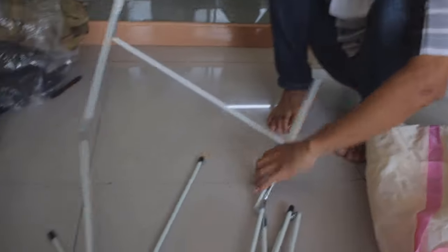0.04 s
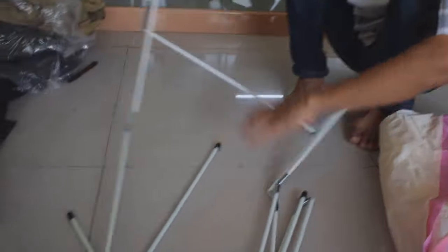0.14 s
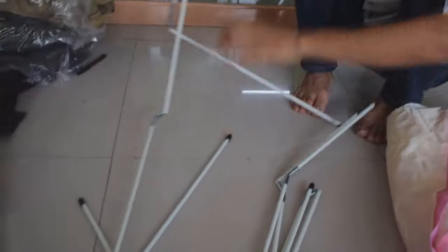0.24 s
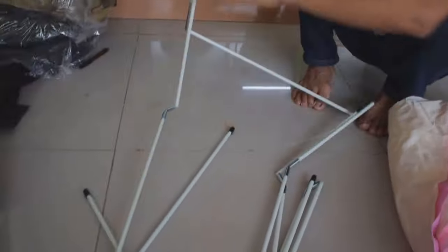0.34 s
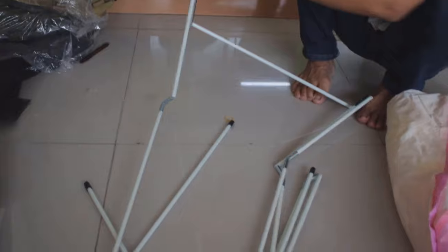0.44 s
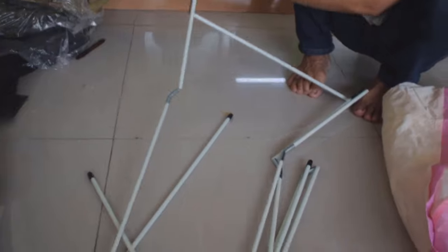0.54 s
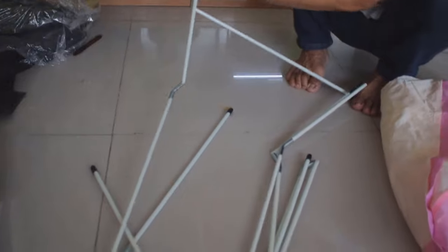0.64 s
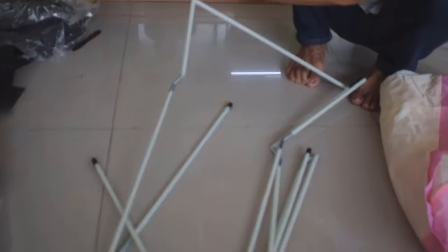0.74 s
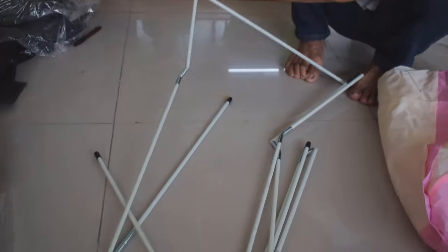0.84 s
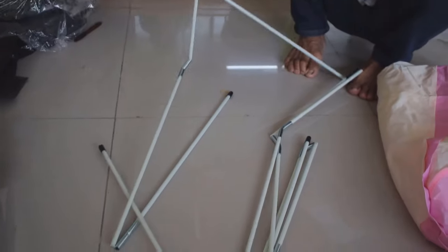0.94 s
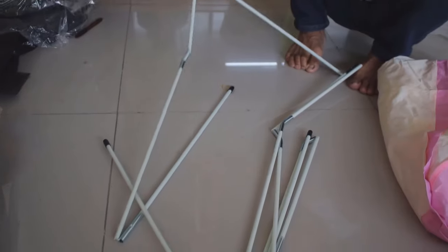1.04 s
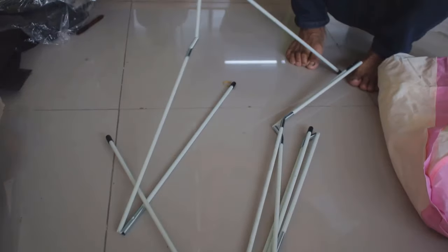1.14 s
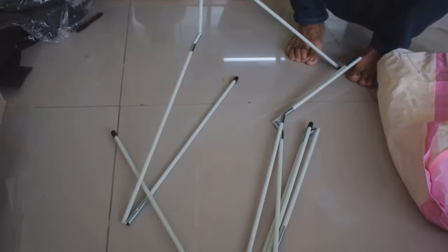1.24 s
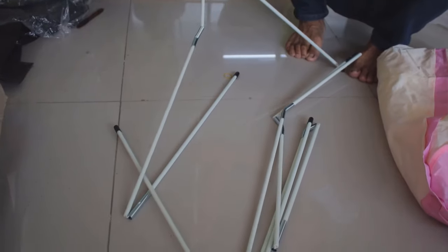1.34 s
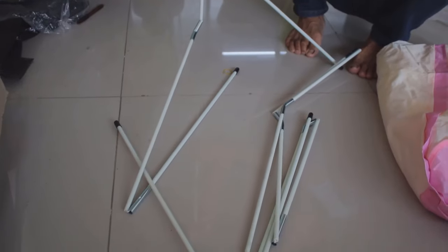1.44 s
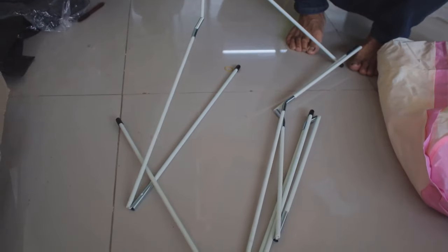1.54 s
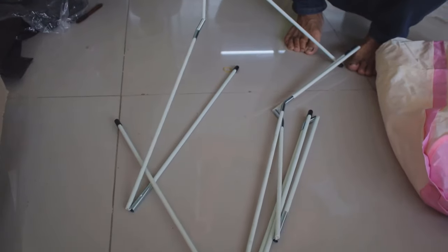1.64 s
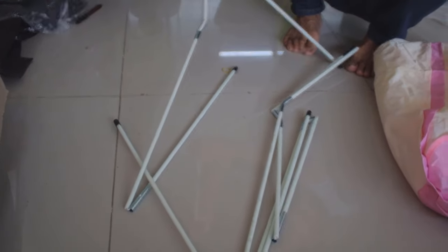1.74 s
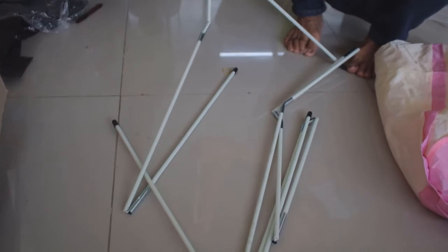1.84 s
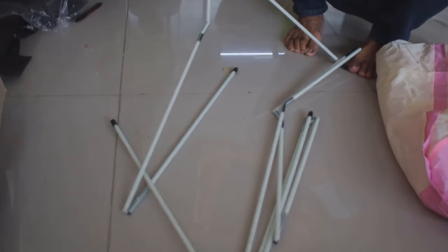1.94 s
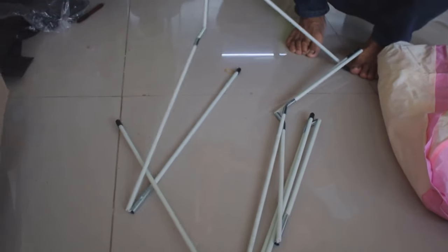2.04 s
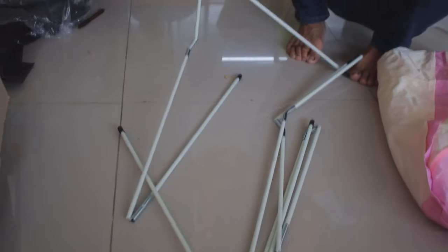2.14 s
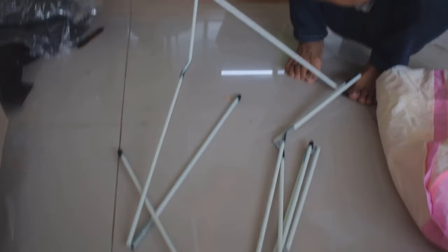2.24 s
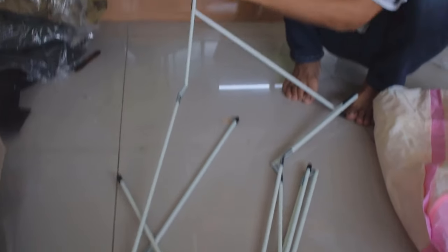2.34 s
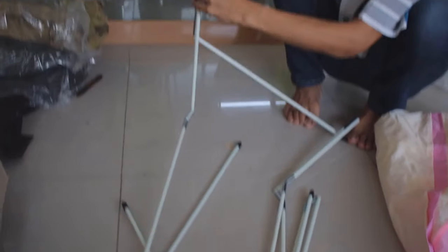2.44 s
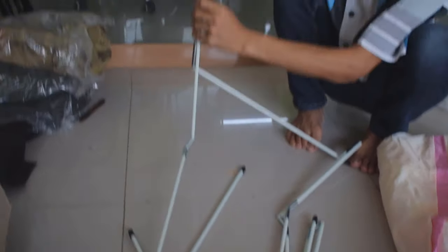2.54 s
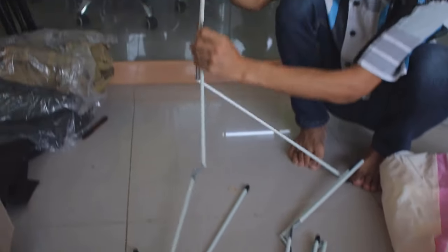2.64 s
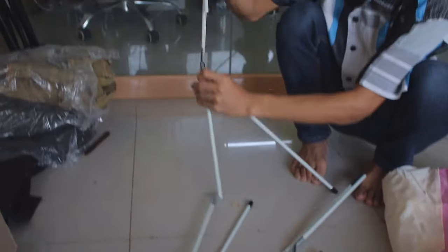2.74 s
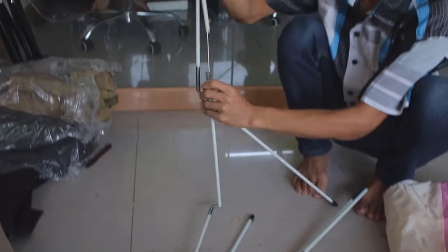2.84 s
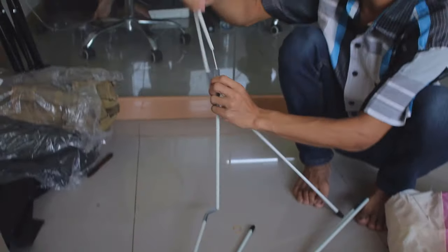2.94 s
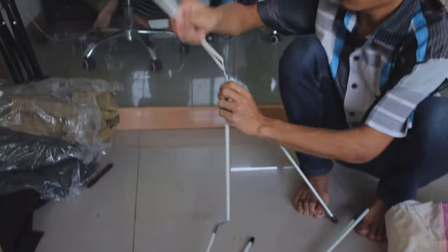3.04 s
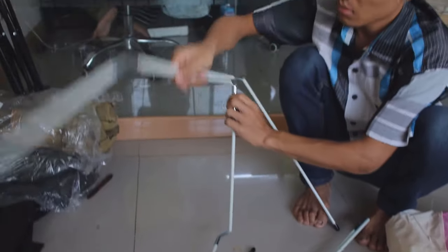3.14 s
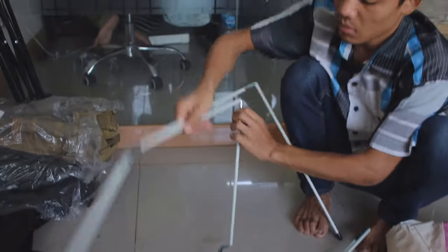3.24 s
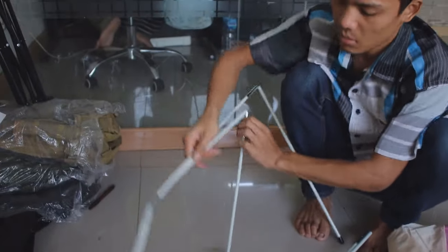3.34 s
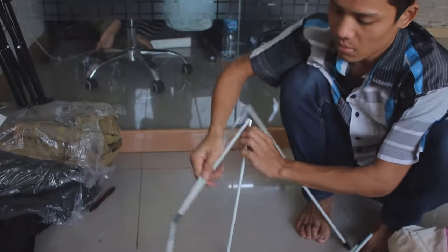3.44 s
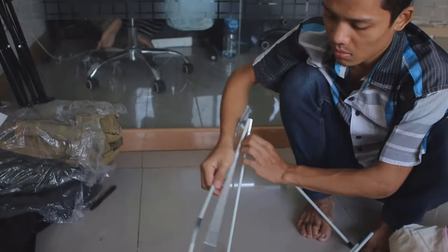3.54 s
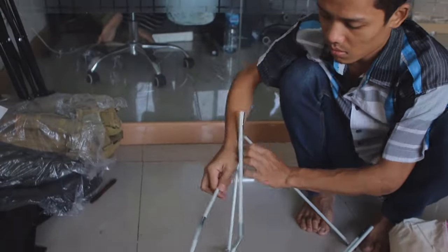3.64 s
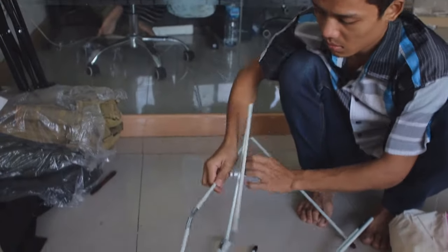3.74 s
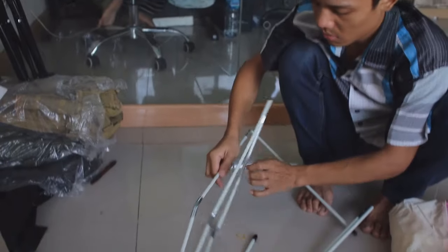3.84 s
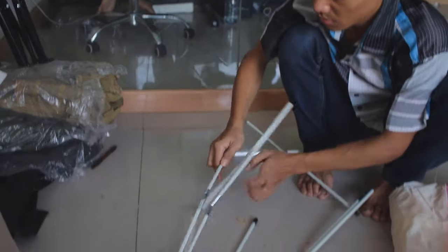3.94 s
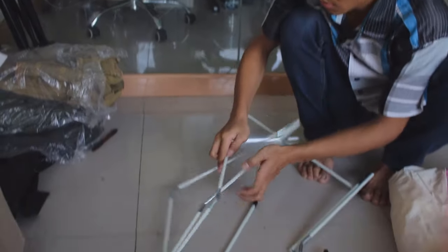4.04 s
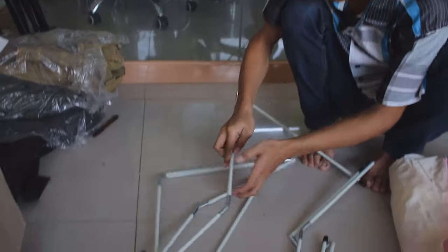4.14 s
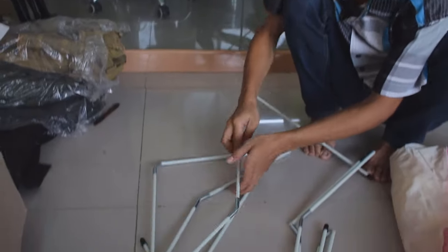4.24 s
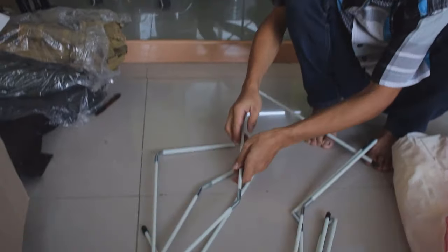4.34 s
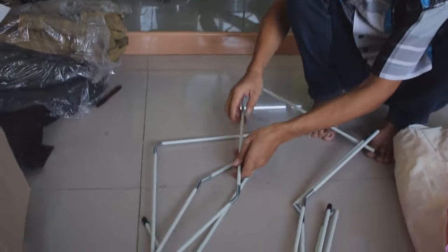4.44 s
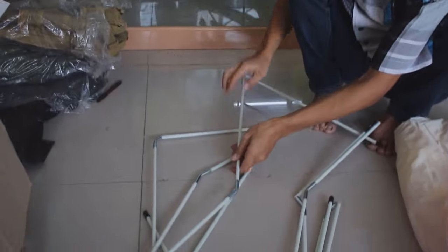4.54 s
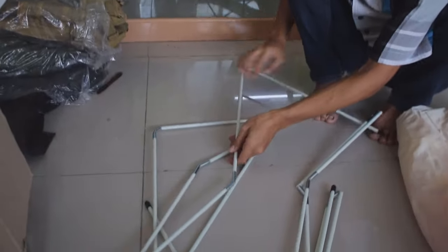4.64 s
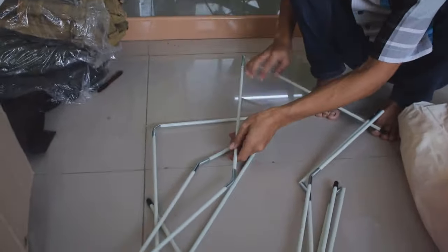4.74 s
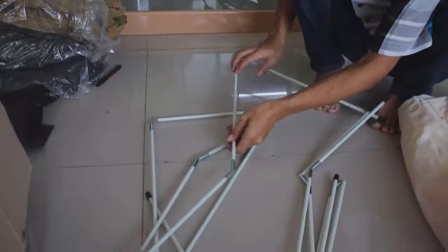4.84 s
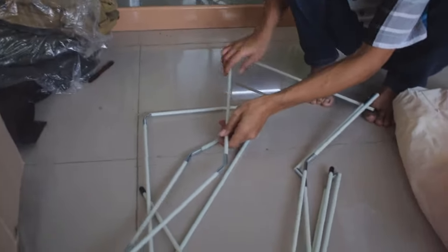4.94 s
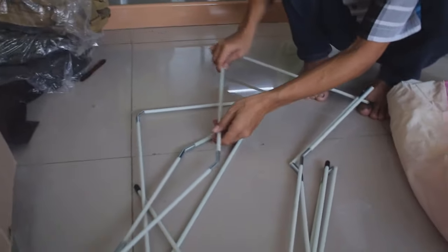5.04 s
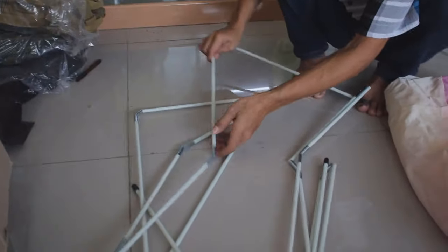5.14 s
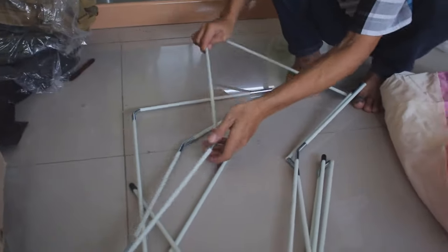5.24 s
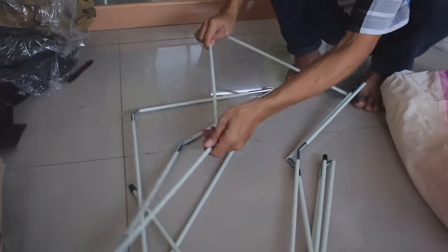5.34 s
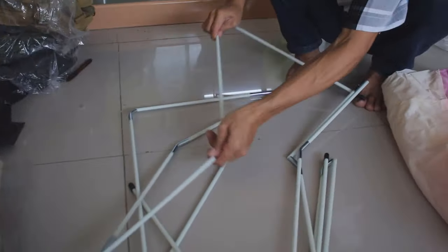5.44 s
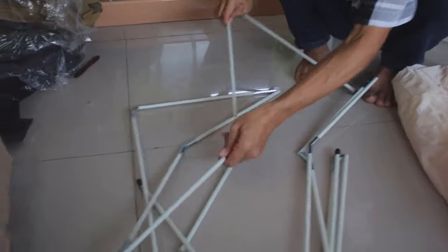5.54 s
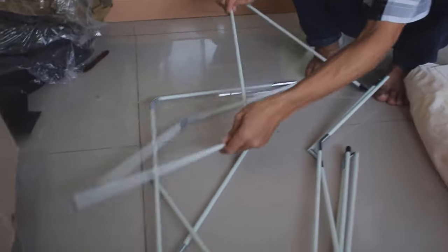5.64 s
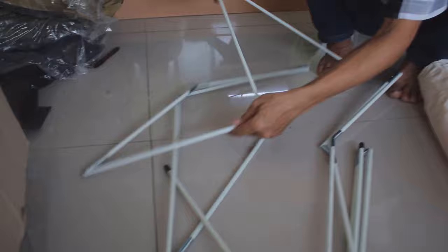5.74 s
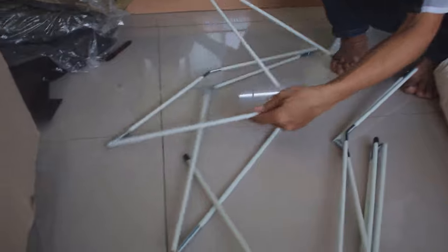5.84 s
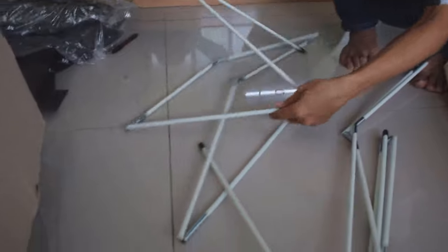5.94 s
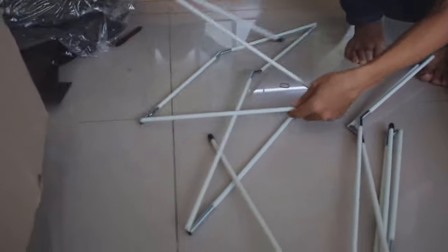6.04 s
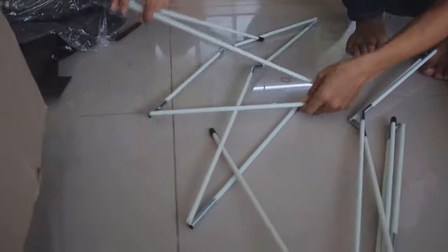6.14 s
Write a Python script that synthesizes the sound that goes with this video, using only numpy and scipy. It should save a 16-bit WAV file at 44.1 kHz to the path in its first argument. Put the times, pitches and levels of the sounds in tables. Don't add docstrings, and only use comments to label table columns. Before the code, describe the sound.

Thin poles clack against each other and the floor in a bare, lively room. Sparse taps and faint creaks give way to hard metallic cracks mid-way, the loudest slightly distorted, followed by dense jangling that settles quickly. Light clinks return and build into another clattering burst. Underneath, a wavering distant motor and soft street rumble continue, heard in mono from nearby.

```python
import sys
import numpy as np
from scipy import signal
from scipy.fft import rfft, irfft
from scipy.io import wavfile
from scipy.ndimage import uniform_filter1d

SR = 44100
rng = np.random.default_rng(int(sys.argv[2]) if len(sys.argv) > 2 else 0)


def field_ratio(decibels):
    return 10 ** (np.asarray(decibels, dtype=float) / 20)


def dump(signal):
    limited = np.clip(np.atleast_2d(signal).T, -1, 1)
    pcm = np.round(limited * 32767).astype(np.int16)
    wavfile.write(sys.argv[1], SR, pcm)


N = 272626


def rms_one(x):
    return x / np.sqrt(np.mean(x ** 2) + 1e-20)


def in_time(rows):
    s, *columns = np.transpose(rows)
    return [np.interp(np.arange(N) / SR, s, column) for column in columns]


def at_hz(points, hz):
    points_hz, values = np.transpose(points)
    return np.interp(np.log(hz), np.log(points_hz), values)


def drift(rate):
    r = np.exp(-80 * np.pi * rate / SR)
    slow = signal.lfilter([1], [1, -2 * r, r * r], rng.standard_normal(N // 40 + 2002))[2000:]
    return np.interp(np.arange(N) / 40, np.arange(len(slow)), rms_one(slow))


def add(track, s, sound):
    i = round(s * SR)
    track[i:i + len(sound)] += sound[:N - i]


def ring(clicks, hz, t60):
    r, w = field_ratio(-60 / (t60 * SR)), 2 * np.pi * hz / SR
    return signal.lfilter([0, np.sin(w)], [1, -2 * r * np.cos(w), r * r], clicks + 1e-18)


def response(hz, t60, delay):
    r, w = field_ratio(-60 / (t60 * SR))[:, None], 2 * np.pi * hz[:, None] / SR
    return delay / (1 - 2 * r * np.cos(w) * delay + (r * delay) ** 2)


def blow(own_hz, modes_hz, modes_db, cycles, chatter_s, own_db, size=1800):
    touch = (chatter_s * SR * np.sort(rng.random(20)) ** 1.4).astype(int)
    touch -= touch[0]
    fading = field_ratio(-17.0 * touch / (chatter_s * SR))
    scattered_hz = modes_hz * (1 + 0.024 * rng.standard_normal(len(modes_hz)))
    hz = np.minimum(np.append(scattered_hz, own_hz), .45 * SR)
    turn = -2j * np.pi * np.fft.rfftfreq(size)
    strengths = fading * rng.standard_normal((len(hz), 20))
    clicks = strengths @ np.exp(np.outer(touch, turn))
    soft_start = response(hz, cycles / hz / 2, np.exp(turn))
    modes = clicks * soft_start * response(hz, cycles / hz, np.exp(turn))
    modes /= np.linalg.norm(modes, axis=1, keepdims=True)
    out = irfft(field_ratio(np.append(modes_db, own_db)) @ modes, size)
    return out / np.abs(out).max()


def small_hits(rows, low_hz, high_hz, cycles, chatter_s, own_db):
    out, modes_hz = np.zeros(N), np.geomspace(low_hz, high_hz, 14)
    for s, peak_db, hz in rows:
        near_db = -7.0 * np.abs(np.log2(modes_hz / hz))
        add(out, s - .0004, field_ratio(peak_db) * blow(hz, modes_hz, near_db, cycles, chatter_s, own_db, size=900))
    return out


def ringing(s, strength_db, modes, spread_db):
    luck, out = rng.standard_normal((len(s), len(modes))), np.zeros(N)
    for k, (hz, level_db, t60) in enumerate(modes):
        clicks = np.zeros(N)
        clicks[(s * SR).astype(int)] = field_ratio(strength_db + level_db + spread_db * luck[:, k])
        out += ring(clicks, hz, t60)
    return out


def drags(strokes):
    out = np.zeros(N)
    for s, length, db, hz in strokes:
        rub = rng.standard_normal(round(3 * length * SR))
        stroke = np.exp(-((np.arange(len(rub)) / SR / length - 1.5) / 0.49) ** 2)
        add(out, s - length, field_ratio(db) * stroke * rms_one(ring(rub, hz, 0.021)))
    return out


def shaped(spectrum, bands, size):
    hz = np.maximum(np.fft.rfftfreq(size, 1 / SR), 1)
    humps_db = sum(db / (1 + (2 * (hz - centre) / width) ** 2) for centre, width, db in bands)
    return irfft(rfft(rng.standard_normal(size)) * field_ratio(at_hz(spectrum, hz) + humps_db), size)


# frequency in Hz, level in dB per Hz.
AIR = [(15, -40), (25, -15), (59, -5), (148, -3.5), (178, -11.5), (209, -1), (359, 0), (445, -1.5),
       (614, 0.5), (782, -16), (3000, -7.5), (3930, -14), (15500, -37)]
# centre in Hz, width in Hz, gain in dB.
AIR_BANDS = [(564, 55, 1), (986, 260, 16.5), (1500, 100, 8), (2840, 100, 4.5), (3000, 78, 3),
             (4400, 170, 11.5)]
# time in seconds, level in dB.
STREET = [
    (0.0, -48.5),
    (3.8, -48),
    (3.92, -55),
    (4.1, -52),
    (4.3, -38),
    (4.75, -44),
    (6.04, -40),
    (6.18, -46),
]
# time in seconds, level in dB.
MOTOR_LOAD = [(0, -48), (.31, -39), (.91, -46), (1.6, -46), (1.95, -39), (2.38, -35), (2.8, -33),
              (3.1, -38.5), (3.39, -44), (3.6, -27), (3.85, -55), (4.2, -39.5), (4.61, -42.5),
              (4.89, -40.5), (5.16, -40.5), (5.56, -34.5), (5.82, -35), (6.18, -33)]
MOTOR_HZ = (59.2, 121, 173)


def background():
    (noise_db,), (load_db,) = in_time(STREET), in_time(MOTOR_LOAD)
    mean_db = load_db.mean()
    noise = rms_one(shaped(AIR, AIR_BANDS, N)) * field_ratio(noise_db + 10.5 + 2.0 * drift(1.1))
    murmur = signal.sosfilt(signal.butter(2, [150.0, 650.0], "band", fs=SR, output="sos"), noise)
    out = noise + murmur * (field_ratio(1.3 * drift(14.0) + 0.3 * (load_db - mean_db)) - 1)
    turn = 2 * np.pi * np.cumsum(1 + 0.0597 * drift(8.87)) / SR
    orders_db, load_shares = (-7.5, -2, -9), (1, 0.98, 1.35)
    for hz, db, share in zip(MOTOR_HZ, orders_db, load_shares):
        order_db = mean_db + db + share * (load_db - mean_db) + 5.4 * drift(7.6)
        out += field_ratio(order_db) * np.sin(hz * turn)
    return out


# start in seconds, hold in seconds, level in dB,
# place along the pole from 0 at the butt to 3 at the sleeve.
SHAKES = [(0.0, 0.036, -20, 2.8), (0.001, 0.02, -19, -1), (0.267, 0.049, -11, 3.5), (0.6, 0.073, -19.5, 3),
          (0.8, 0.035, -10.5, 1.46), (2.035, 0.04, -31, -4), (2.51, 0.24, -23, 1.4), (2.692, 0.062, -20, 3),
          (2.739, 0.11, -12, 1.5), (2.851, 0.0068, -6, 1.8), (2.971, 0.02, -14, 2.5),
          (1.675, 0.015, -22, 2.1), (3.39, 0.057, -16.5, 1.4), (3.5, 0.11, 1.5, 1.0),
          (3.57, 0.042, -20, 2.9), (3.82, .23, -22, 2.5), (4.078, .06, -17, 6), (4.234, 0.16, 6, 1.5),
          (4.33, 0.038, 4, 1.2), (4.37, 0.072, -2, 7.4), (4.62, 0.036, -17.5, 1.4), (4.919, 0.16, -16, 1.1),
          (5.38, 0.033, -13, 3.2), (5.469, 0.047, -13, 1), (5.6, 0.055, -14, 1.5), (5.72, 0.046, -4, -2.5),
          (5.83, 0.064, 3, 3), (5.98, 0.048, 8, 2.5), (6.061, 0.013, 1, 3.5), (6.16, .03, -3, 2),
          (3.45, 0.079, 11, 6), (3.52, 0.082, 6, 4), (3.495, 0.069, 7.5, 2), (2.805, 0.034, -5.5, 0.8),
          (3.55, .1, -4.5, -0.5), (.82, 0.027, -21, 6)]
# time in seconds, effort in dB, gain in dB per part towards the sleeve.
HANDLING = [(0, -20.5, 13.5), (.5, -29.5, 0.5), (1.0, -30, -3), (1.4, -34.5, 0.5), (1.75, -43.5, -9),
            (2.1, -34, -1), (2.451, -38.5, 7.5), (3.1, -27, 2), (3.7, -25.5, -5), (4.4, -18.5, 4),
            (4.85, -26, 0.5), (5.2, -24, -2.5), (5.599, -18.5, 5.5), (5.95, -12, 2), (6.18, -29, 18.5)]


def looseness(place):
    rise_db_s, fall_db_s, loss_db_per_part = 520, 256, 13
    t = np.arange(0, N + 64, 64) / SR
    s, held, db, at = np.transpose(SHAKES)[:, :, None]
    shakes_db = db - rise_db_s * np.maximum(s - t, 0) - fall_db_s * np.maximum(t - s - held, 0)
    when, effort_db, lean_db = np.transpose(HANDLING)
    hands_db = np.interp(t, when, effort_db + lean_db * (place - 1.5))
    power = field_ratio(2 * hands_db) + field_ratio(2 * (shakes_db - loss_db_per_part * np.abs(place - at))).sum(axis=0)
    return np.interp(np.arange(N) / SR, t, np.sqrt(power))


# frequency in Hz, level in dB a mode.
RATTLE_COLOUR = [(330, -14), (520, -15), (1150, -9.5), (2800, -8), (7500, -13), (11000, -18), (15500, -33)]
PART_HZ = (520, 1150, 2800, 7500)


def rattle(per_s, cycles, uneven_db, count):
    sizes = field_ratio(uneven_db * np.minimum(rng.exponential(1, N), 4)) * rng.choice([-1, 1], N)
    ticks = sizes * (rng.random(N) < per_s * field_ratio(4.0 * drift(25)) / SR)
    out = np.zeros(N)
    for hz in np.geomspace(330, 15000, count):
        woken = rng.random(N) < .3
        place = np.interp(np.log(hz), np.log(PART_HZ), np.arange(4))
        soft_start = ring(ticks * woken, hz, cycles / hz / 2)
        mode = rms_one(ring(soft_start, hz, cycles / hz))
        out += mode * looseness(place) * field_ratio(at_hz(RATTLE_COLOUR, hz))
    return out


# frequency in Hz, t60 in seconds.
ROOM_T60 = [(200, 0.55), (1000, 0.49), (4000, 0.4), (14000, 0.37)]
# delay in seconds, level in dB.
ECHOES = [(.0065, -20), (0.02, -26), (0.029, -22), (0.047, -17.5)]


def room(x, tail_db=-0.5):
    t, tail = np.arange(SR) / SR, np.zeros(SR)
    edges = 150 * 2 ** np.arange(0, 7.1, .5)
    for low, high in zip(edges, edges[1:]):
        band_pass = signal.butter(2, [low, high], "band", fs=SR, output="sos")
        band = signal.sosfilt(band_pass, rng.standard_normal(SR))
        tail += band * field_ratio(-60 * t / at_hz(ROOM_T60, np.sqrt(low * high)))
    tail *= np.clip(t / 0.012, 0, 1)
    tail *= field_ratio(tail_db) / np.sqrt(np.sum(tail ** 2))
    tail[0] = 1
    for s, level_db in ECHOES:
        tail[round(s * SR)] += field_ratio(level_db)
    return signal.fftconvolve(x, tail)


def moving_room(x, count=5):
    step, out = N // (count - 1) + 1, np.zeros(N)
    for k in range(count):
        span = np.arange(max(k - 1, 0) * step, min((k + 1) * step, N))
        fade = (1 - np.abs(span / step - k)) ** .5
        add(out, span[0] / SR, room(x[span] * fade))
    return out


def earlier():
    modes_hz = np.geomspace(900, 14000, 36)
    colour_db = at_hz(RATTLE_COLOUR, modes_hz)
    hit = blow(1620.0, modes_hz, colour_db, cycles=13.8, chatter_s=.008, own_db=-3.0)
    out = np.zeros(N)
    add(out, 0, field_ratio(10) * room(hit)[round(.03 * SR):])
    return out


# start in seconds, peak in dB, strongest ring in Hz,
# lows in dB re peak, highs in dB re peak.
KNOCKS = [(0.0686, 13, 6800, -10.5, -10), (0.2445, 2.5, 6900, -15, -31), (0.2778, 8, 4960, -9, -22),
          (0.8001, 0, 3000, -33, -11), (2.799, 11.5, 4100, -6, -11), (2.8569, 2, 4260, 0, -14),
          (2.8809, 0.5, 3950, -19, -31), (3.1427, -1, 4300, -7.5, -12), (3.4438, 30.5, 7900, -34, 1.5),
          (3.5684, 18.5, 6150, -32, -7), (3.5918, 11, 6300, -40, -22), (4.0679, 1, 5800, -24, -14),
          (4.1994, 37, 6200, -8.5, 5), (4.9434, 0, 6900, -31, -2), (5.43, 1.5, 5550, -11, -9),
          (5.4994, -1, 5360, -23, -10), (5.5524, 0.5, 2520, -20, -45), (5.6484, 1, 4770, -33, -15),
          (5.6663, 2.5, 5860, -17, -21), (5.7019, 2, 5260, -31, -34), (5.8175, 11, 5760, -22, -5),
          (5.9347, 24.5, 3400, -13, -1), (5.9582, 16.5, 2680, -10, -1), (6.134, 12, 3380, -3.5, -26)]
# start in seconds, peak in dB, strongest ring in Hz,
# highs in dB re peak.
TAPS = [(0.2938, -15, 4760, -15), (0.4252, -11, 3450, -43), (0.507, -4, 4200, -22), (0.604, -4, 3180, -2),
        (1.144, -4, 3470, -19), (1.289, -11.5, 3180, -12), (2.1884, -21.5, 5840, -30), (2.39, -21, 5770, 4),
        (2.4257, -22, 4700, 4), (2.5308, -1, 7400, -10), (2.6638, -4.5, 4040, -29), (2.7067, -8, 9200, 4),
        (3.026, -14.5, 4530, -50), (3.2933, -2.5, 3590, -37), (3.743, -20, 5360, -35),
        (4.029, -2.5, 8500, -25), (5.2324, -12.5, 5240, -15), (5.2577, -14, 4060, -12),
        (5.281, -14, 5460, 8), (5.302, -6.5, 3100, -24), (5.367, -12.5, 6070, -19), (5.402, -11, 5900, -9),
        (5.5755, -4.5, 2530, -14), (5.604, -9, 2600, -30), (5.731, -7, 4400, -25), (5.7827, -7, 6080, -31),
        (6.101, -12, 3130, -27)]
# start in seconds, peak in dB, strongest ring in Hz,
# lows in dB re peak.
BUMPS = [(0.4718, -12, 4400, -2), (0.823, -26, 3180, -4), (1.118, -21, 2980, -2), (1.173, -12, 3470, -8),
         (2.0683, -17, 6360, -8), (2.2838, -24, 8240, -19), (3.4016, -31, 3380, -2), (3.884, -13, 2840, 3),
         (3.994, -7.5, 3620, 0), (4.173, -19, 6480, 14), (4.654, -13, 2770, 3), (4.7184, -5, 3540, -9.5),
         (4.874, -22, 2600, 6), (5.049, -5, 2730, -10.5), (5.3257, -10.5, 3000, -19)]


def contacts():
    tap_lows_db, bump_highs_db = -37, -11
    taps = [(s, db, hz, tap_lows_db, high_db) for s, db, hz, high_db in TAPS]
    bumps = [(*bump, bump_highs_db) for bump in BUMPS]
    return KNOCKS + taps + bumps


# start in seconds, peak in dB, strongest ring in Hz, # lows
# in dB re peak, highs in dB re peak.
MORE_KNOCKS = [
    (0.829, -20, 3180, -13, -28),
    (0.8438, -15.5, 3100, -19, -25),
    (1.161, -18, 3600, -1, -20),
    (2.8142, 8, 4070, -4, -7),
    (3.9005, -10, 2570, 6, -31),
    (4.219, 7, 8050, -17, -14),
    (5.639, -10, 5560, -20, -32),
    (5.9734, -7, 4250, -16, -12),
]


def knocks():
    out, modes_hz = np.zeros(N), np.geomspace(1300, 15500, 36)
    for s, peak_db, hz, low_db, high_db in contacts() + MORE_KNOCKS:
        tilt = at_hz([(1800, low_db - 0.5), (3200, -9.0), (8000, -4.5), (12000, high_db - 7.5),
                      (15500, high_db - 30.0)], modes_hz)
        sound = blow(hz, modes_hz, tilt, cycles=15, chatter_s=.008, own_db=-1)
        add(out, s - .0004, field_ratio(peak_db) * sound)
    return out


# frequency in Hz, level in dB, t60 in seconds.
SLEEVE = [(4160, -46, .15), (5120, -46, .2), (6300, -44, .15), (6550, -46, .55), (7300, -46, .55),
          (7644, -45, .3), (7900, -44, .15), (8393, -46, .2), (9400, -50, .45), (11500, -50, .2),
          (12500, -50, .4)]


def sleeves():
    s, peak_db = np.transpose(contacts())[:2]
    return ringing(s, np.minimum(peak_db, 14), SLEEVE, spread_db=5)


# start in seconds, peak in dB, ring in Hz, lows in dB re peak.
THUDS = [(0.077, -6.5, 1730, -31), (0.248, -8.5, 1620, -45), (0.292, -6.5, 1200, -39),
         (0.806, -14, 1970, -17), (0.825, -14, 1880, -6), (1.152, -20, 930, -13), (1.181, -7, 960, -12),
         (2.673, -20, 1500, -17), (2.725, -16, 1360, 2), (2.855, -10, 1270, -15), (3.149, -23, 1410, -30),
         (3.445, 11, 1500, -1.5), (3.492, 16, 1040, -29), (3.716, -26.5, 1120, -33),
         (3.864, -15, 1040, -26), (3.881, 1.5, 1323, -19), (4.07, -13.5, 1500, -38), (4.2, 15, 1340, -2.5),
         (4.265, 2, 1930, -16), (4.656, -27.5, 1880, -10), (4.943, -25, 493, -13), (5.222, -25, 404, 2),
         (5.3, -13, 1780, -19), (5.552, -11.5, 1710, -15), (5.705, -9.5, 846, -34), (5.874, -13, 450, 2),
         (5.936, 10.5, 1120, -10.5), (6.028, -1, 570, -22), (6.134, -4, 1440, -24.5)]


def thuds():
    out, modes_hz = np.zeros(N), np.geomspace(320, 2600, 20)
    for s, peak_db, hz, low_db in THUDS:
        tilt = at_hz([(330, low_db - 6.0), (550, low_db - 1.5), (1000, -5.0), (1600, -12.0),
                      (2600, -10.0)], modes_hz)
        sound = blow(hz, modes_hz, tilt, cycles=7, chatter_s=.012, own_db=-2)
        add(out, s - .0015, field_ratio(peak_db) * sound)
    return out


# start in seconds, peak in dB, ring in Hz.
RESTRIKES = [(.0775, 5, 6500), (.2845, 4, 4200), (.2915, 6, 5000), (.2965, 3, 3460), (.3035, -9, 6460),
             (2.86, -5, 5500), (2.883, -3, 6300), (2.823, 2, 7000), (3.0275, -20, 6000), (3.081, -20, 5000),
             (3.452, 27, 7800), (3.465, 16, 8200), (3.475, 19, 7000), (3.49, 23, 7670), (3.52, 20, 7520),
             (3.545, 12, 6700), (4.222, 6, 7800), (4.265, 6, 9340), (4.37, 11, 9300), (4.425, -4, 8500),
             (4.478, -17, 3440), (5.6395, -7, 5500), (5.4345, -12, 5470), (5.404, -12, 9800),
             (.627, -12, 5000)]


def restrikes():
    return small_hits(RESTRIKES, 2380.0, 16300.0, cycles=15.0, chatter_s=.003, own_db=10.5)


# start in seconds, level in dB.
TUBE_HITS = [
    (.279, -34),
    (1.172, -31),
    (4.945, -40),
]
# frequency in Hz, level in dB, t60 in seconds.
TUBE = [(1445, -10, .6), (1949, -8, .5), (2595, -2, 1.7), (2612, -10, 1.2), (3020, -3, 1.3),
        (3040, -10, 1.0), (3429, -5, 1.6), (3452, -9, 1.2)]


def tube():
    return ringing(*np.transpose(TUBE_HITS), TUBE, spread_db=1.0) * field_ratio(3.1 * drift(53.0))


# start in seconds, level in dB.
PUSHES = [
    (0.29, -18),
    (2.87, -28),
    (3.502, -12),
    (4.202, -23),
]


def pushes(hz=180.0, t60=0.022):
    return ringing(*np.transpose(PUSHES), [(hz, 0, t60), (1.6 * hz, -1.5, t60)], spread_db=0)


# start in seconds, length in seconds,
# level in dB, ring in Hz.
CREAKS = [(.35, 0.13, -32.5, 306), (0.72, 0.14, -37.5, 256), (2.2, 0.12, -42, 540), (2.12, 0.25, -33, 283),
          (2.36, 0.15, -42.5, 730), (3.1, 0.14, -34, 220), (2.5, 0.12, -37.5, 1000),
          (2.84, 0.066, -19, 337), (3.45, 0.32, -26.5, 334), (2.6, 0.13, -39, 410), (2.4, 0.14, -37, 310),
          (2.2, 0.15, -36, 360), (5.95, 0.074, -28, 520)]


def creaks():
    return drags(CREAKS)


# start in seconds, peak in dB, ring in Hz.
TICKS = [(.8225, -15, 6550), (.8285, -20, 7800), (.844, -8, 8000), (3.457, 4, 7500), (3.495, 5, 2600),
         (3.548, -8, 1890), (3.572, 4, 3840), (3.595, 12.5, 5200), (3.745, -9, 5270), (4.24, -10, 6200),
         (4.288, 9, 6250), (4.33, 7, 7940), (4.35, 7, 3170), (4.389, 7, 7500), (4.403, -1, 4140),
         (4.445, -8, 8000), (4.462, -2, 2660), (5.291, -13, 5700), (5.345, -12, 2750), (5.413, -10, 5800),
         (5.494, -11, 9400), (5.547, -8, 5030), (5.581, -13, 8500), (5.654, 0, 4970), (5.674, -5, 7900),
         (5.69, -3, 4520), (5.739, -5, 4400), (5.8118, 4, 8600), (5.828, 11.5, 5700), (5.845, -1, 6460),
         (5.862, -1, 5700), (5.896, 2, 5850), (5.951, 13, 2200), (6.03, 6, 2280), (6.057, 7, 6660),
         (6.102, -6, 5480)]


def ticks():
    return small_hits(TICKS, 2000.0, 15000.0, cycles=22.0, chatter_s=0.0049, own_db=12.5)


# start in seconds, length in seconds, level in dB, ring in Hz.
SKIDS = [
    (1.15, 0.064, -29.5, 655),
    (4.953, 0.1, -25, 503),
]


def skids():
    return drags(SKIDS)


def near_tick():
    out, modes_hz = np.zeros(N), np.geomspace(500, 1500, 8)
    tick = blow(1980, modes_hz, 0 * modes_hz, cycles=7, chatter_s=.006, own_db=6)
    add(out, 1.6765, field_ratio(-12) * tick)
    return out


# start in seconds, peak in dB, frequency in Hz.
PINGS = [(2.069, -22, 6470), (2.799, 4, 2300), (2.803, 4, 6240), (2.812, 1, 3870), (3.744, -10, 5400),
         (2.858, -5, 4220), (2.882, -12, 4140), (3.445, 10, 3000), (3.452, 20, 7500), (3.461, 20, 7250),
         (3.57, 6, 6220), (4.028, -9, 8250), (4.2, 21.5, 2800), (4.203, 12, 6300), (5.3, -7.5, 2650),
         (5.324, -12, 1845), (5.43, -3, 5380), (5.649, -7, 5030), (5.703, -3, 5100), (5.732, -7, 4260),
         (5.782, -4, 6140)]


def pings(cycles=60.0):
    out = np.zeros(N)
    for s, peak_db, hz in PINGS:
        click = np.eye(1, 3000)[0]
        note = ring(ring(click, hz, cycles / hz), hz, cycles / hz / 5)
        add(out, s, field_ratio(peak_db) * note / np.abs(note).max())
    return out


# start in seconds, level in dB.
END_HITS = [
    (2.53, -45),
    (5.299, -21),
    (5.323, -23),
    (5.429, -26),
]
# frequency in Hz, level in dB, t60 in seconds.
END = [(1000, -8, .12), (1460, -12, .2), (1800, -6, .06), (1870, -6, .06), (2660, -6, .05)]


def free_end():
    return ringing(*np.transpose(END_HITS), END, spread_db=2.0)


# start in seconds, peak in dB, ring in Hz.
CLINKS = [(5.3005, -9, 1780), (5.325, -16, 1850), (5.333, -14, 2940), (5.348, -10.5, 1860),
          (5.372, -14, 1890), (2.812, 11, 4030), (2.826, 1, 3880), (2.861, 1, 4180), (2.884, -7, 3900),
          (2.92, -11, 3800), (5.99, 6, 2460), (6.015, 7.5, 2720), (6.045, 1, 2380), (6.075, 1, 2600)]


def clinks():
    return small_hits(CLINKS, 1547.0, 6300.0, cycles=38.0, chatter_s=0.004, own_db=10.5)


# start in seconds, peak in dB, ring in Hz.
SLAPS = [(3.51, 8, 1210), (3.535, -2, 1500), (3.55, 4, 1010), (3.6, 3, 1300), (3.72, -6.5, 1180),
         (3.8845, 3.5, 1290), (3.895, -2.5, 970), (3.91, -4, 1240), (3.94, -6, 1500), (6.15, 0.5, 1020),
         (6.168, -7, 1500), (6.14, 3.5, 1890), (6.158, -6, 840), (6.176, -11, 1110), (2.86, -15, 594),
         (2.872, -8, 1110), (2.886, -19, 700), (2.9, -14, 1020), (3.525, 2.5, 900), (3.57, 5, 1090),
         (3.63, -10, 990)]


def slaps():
    return small_hits(SLAPS, 512.0, 2580.0, cycles=18.0, chatter_s=0.00764, own_db=7.5)


# time in seconds, level in dB.
JANGLE = [
    (4.19, -61),
    (4.215, -7),
    (4.3, 4),
    (4.39, -1),
    (4.5, -34),
    (4.75, -40),
    (4.9, -97),
]
# frequency in Hz, level in dB, t60 in seconds.
JANGLE_MODES = [(2800, -7, 0.0068), (4090, -2, 0.013), (5100, -2.5, 0.0028), (6340, -3, 0.017),
                (7920, -1.5, 0.013), (9200, -4, .008), (10900, -11, .03), (12800, -13, .02),
                (14400, -20, .03)]


def jangle(per_s=1300.0):
    level_db, = in_time(JANGLE)
    impacts = rng.standard_normal(N) * (rng.random(N) < per_s / SR)
    out = np.zeros(N)
    for k, (hz, db, t60) in enumerate(JANGLE_MODES):
        own_impacts = np.roll(impacts, 997 * k)
        out += field_ratio(db) * rms_one(ring(own_impacts, hz, t60))
    return field_ratio(level_db) * out


def small_clatter():
    hits = ticks() + restrikes() + slaps() + clinks()
    return room(hits + field_ratio(-6.0) * jangle() + pings(), tail_db=-5.5)[:N]


def scene():
    loose_joints = field_ratio(-13.0) * rattle(per_s=600.0, cycles=21.0, uneven_db=2.0, count=40)
    poles = knocks() + thuds() + sleeves() + loose_joints
    poles = signal.sosfilt(signal.butter(6, 360.0, "high", fs=SR, output="sos"), poles)
    in_room = moving_room(poles + free_end() + skids() + pushes())
    sound = in_room + tube() + earlier() + near_tick() + background() + small_clatter() + creaks()
    return np.array([sound, sound])


def top_cut(x):
    return signal.sosfilt(signal.butter(12, 15810, fs=SR, output="sos"), x)


def record(dry, limit_db=-6.5, ratio=.68, release_db_s=110.0):
    dip_hz, dip_width_hz, dip_share = 2260, 150, 0.38
    dip = signal.iirpeak(dip_hz, dip_hz / dip_width_hz, SR)
    dry = dry - dip_share * signal.lfilter(*dip, dry)
    level = 10 * np.log10(uniform_filter1d(dry[0] ** 2, size=221, origin=110) + 1e-9)
    ramp = release_db_s * np.arange(N) / SR
    held = np.maximum.accumulate(level + ramp) - ramp
    duck = signal.lfilter([.008], [1, -.992], -ratio * np.maximum(held - limit_db, 0))
    loud = np.clip(dry * field_ratio(duck), -1, 1)
    low_pass = signal.cheby2(12, 40, 15900, fs=SR, output="sos")
    mix = np.clip(signal.sosfilt(low_pass, loud), -1, 1)
    return top_cut(mix)


dry = scene()
out = record(dry)
dump(out)
```